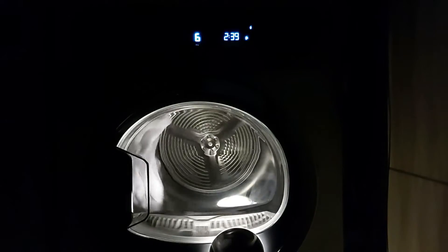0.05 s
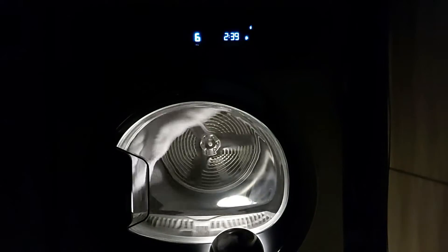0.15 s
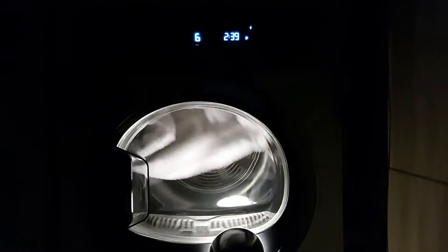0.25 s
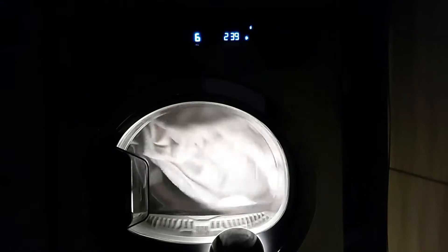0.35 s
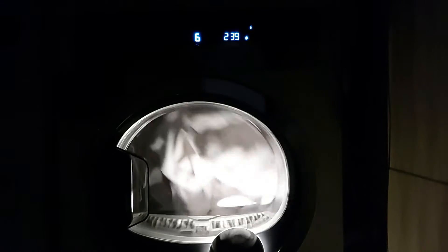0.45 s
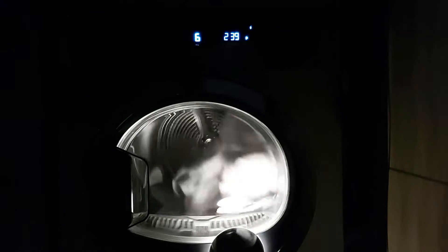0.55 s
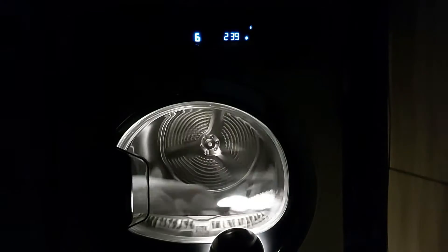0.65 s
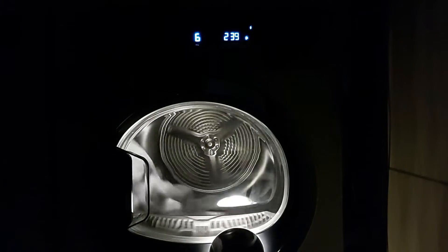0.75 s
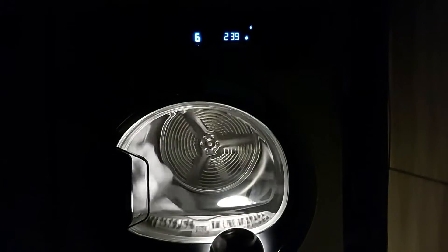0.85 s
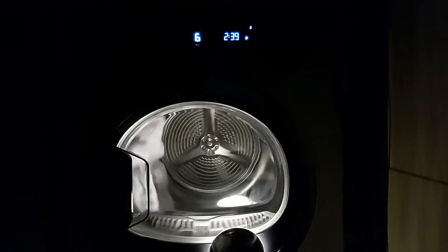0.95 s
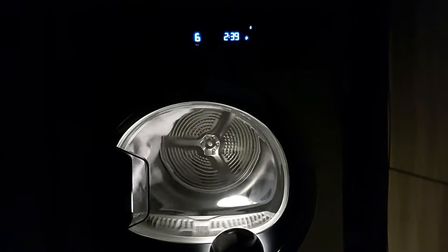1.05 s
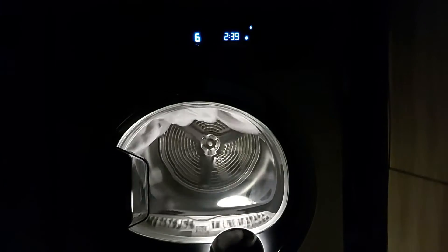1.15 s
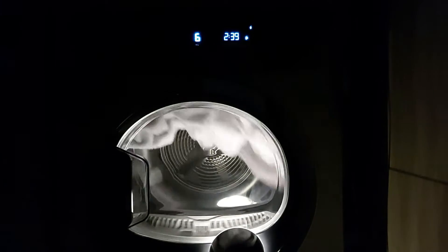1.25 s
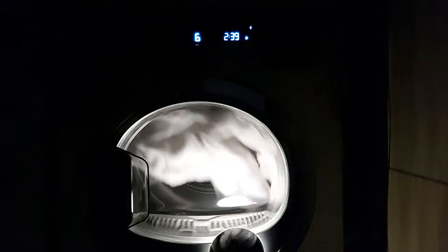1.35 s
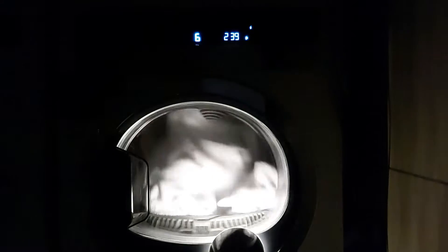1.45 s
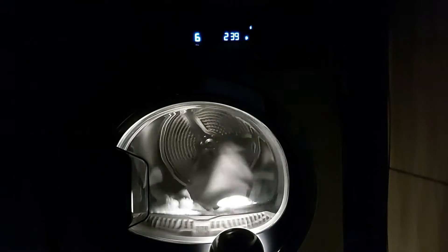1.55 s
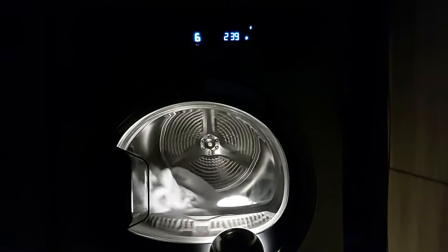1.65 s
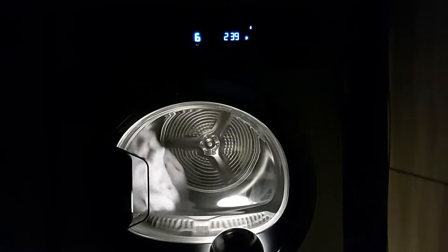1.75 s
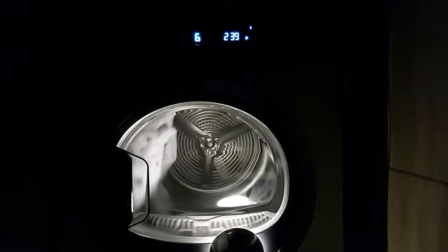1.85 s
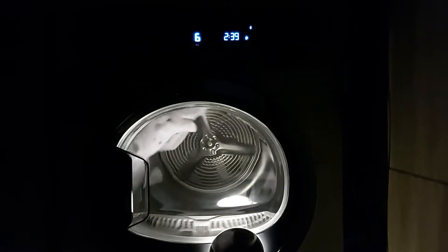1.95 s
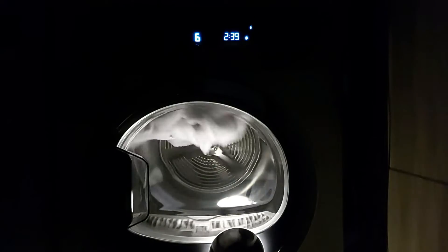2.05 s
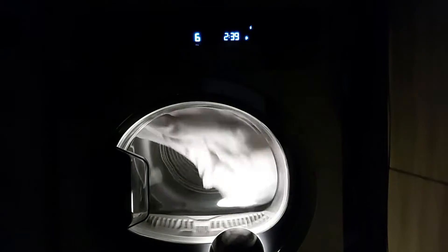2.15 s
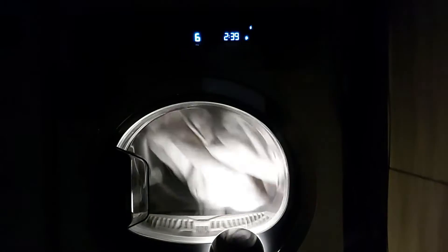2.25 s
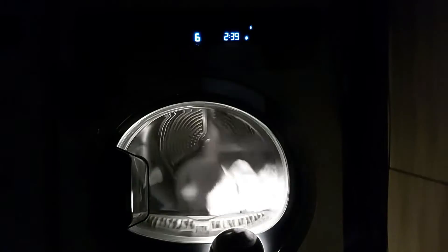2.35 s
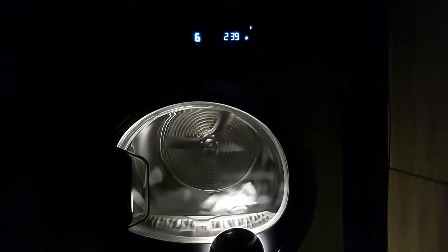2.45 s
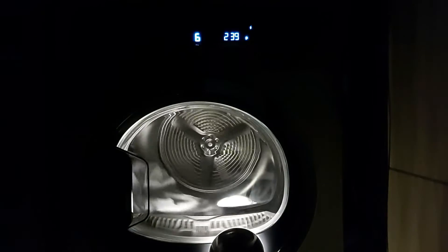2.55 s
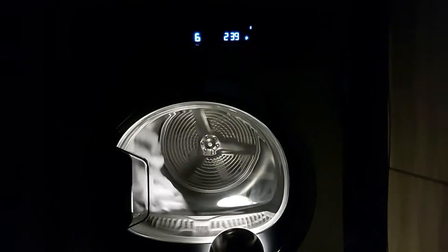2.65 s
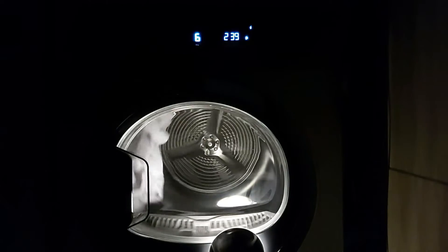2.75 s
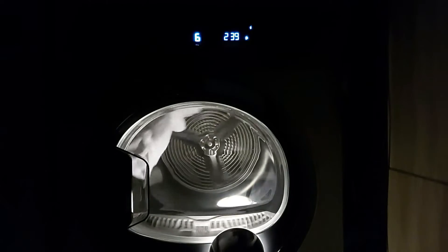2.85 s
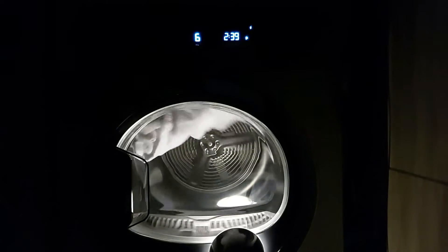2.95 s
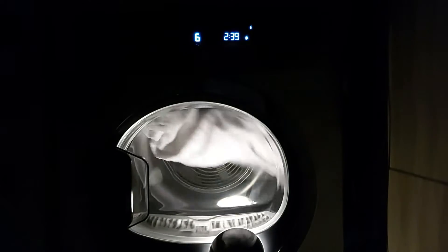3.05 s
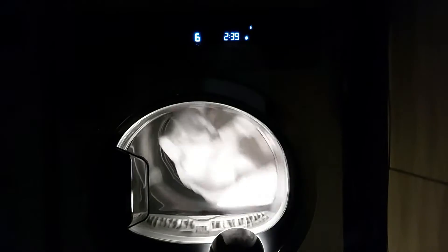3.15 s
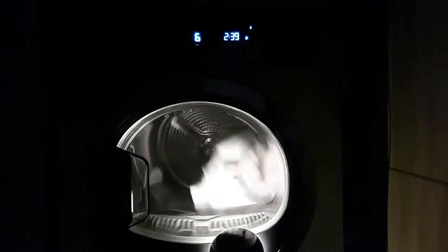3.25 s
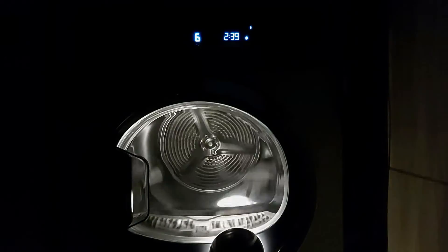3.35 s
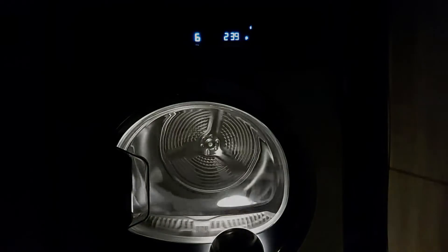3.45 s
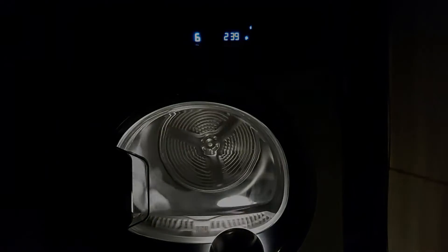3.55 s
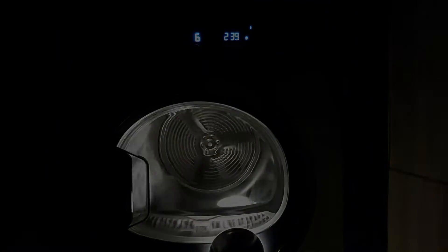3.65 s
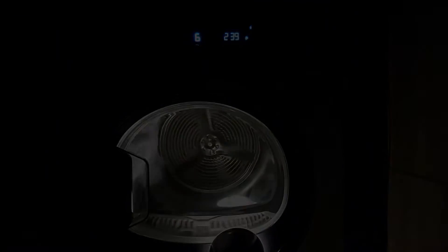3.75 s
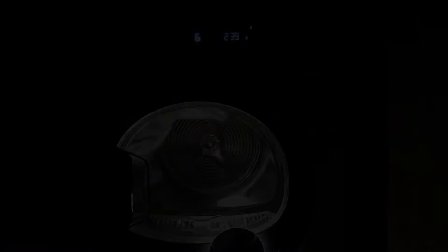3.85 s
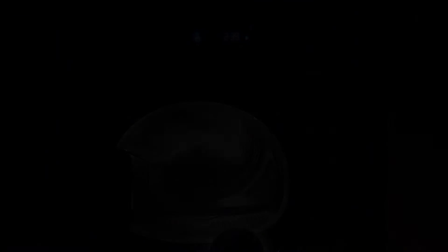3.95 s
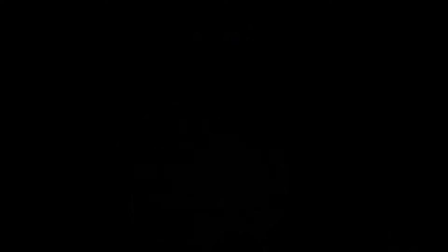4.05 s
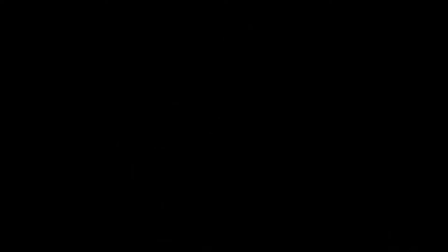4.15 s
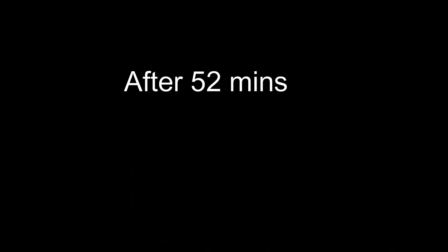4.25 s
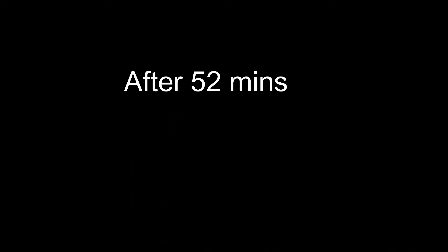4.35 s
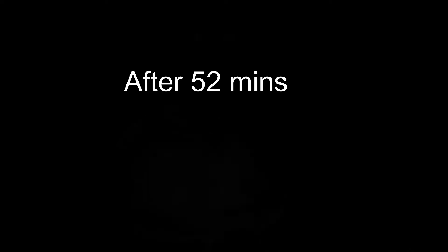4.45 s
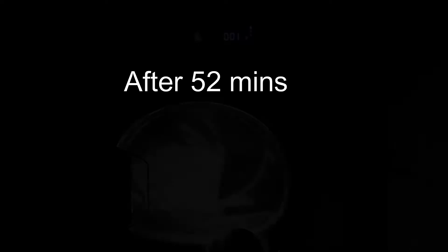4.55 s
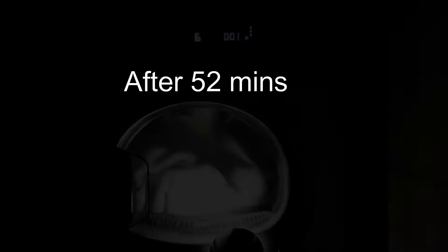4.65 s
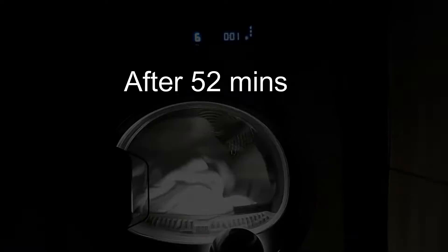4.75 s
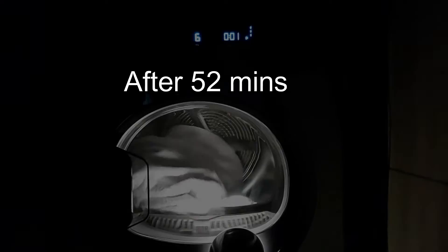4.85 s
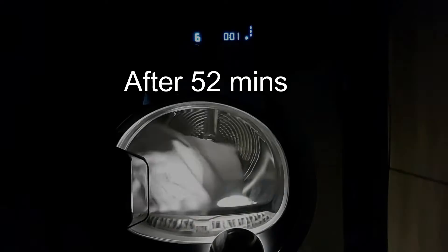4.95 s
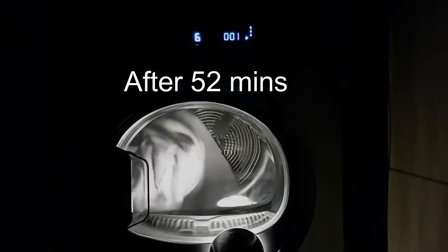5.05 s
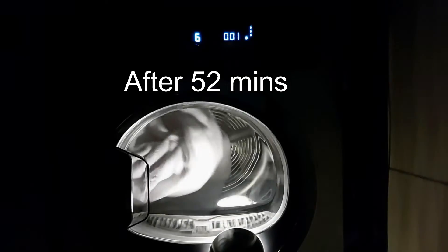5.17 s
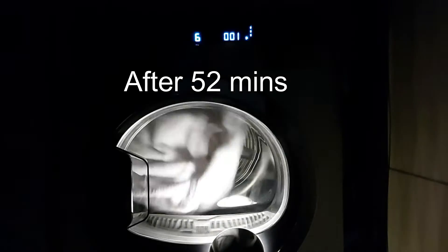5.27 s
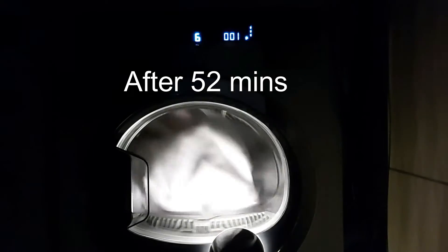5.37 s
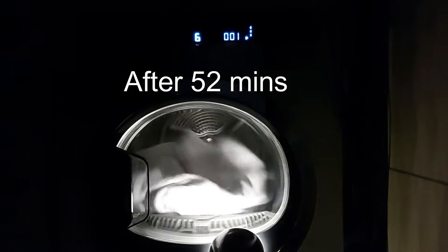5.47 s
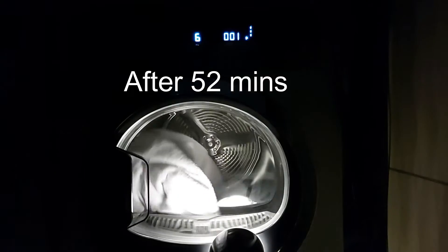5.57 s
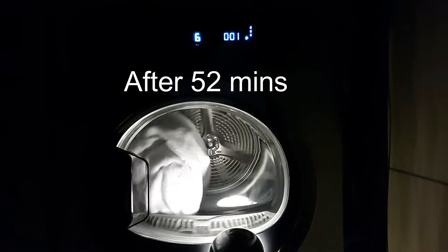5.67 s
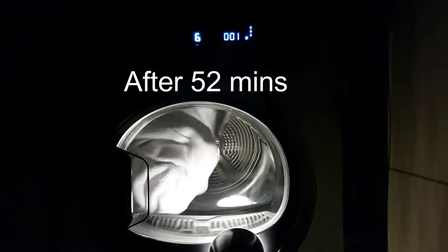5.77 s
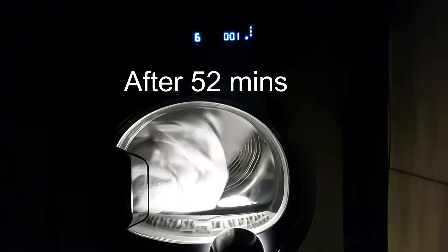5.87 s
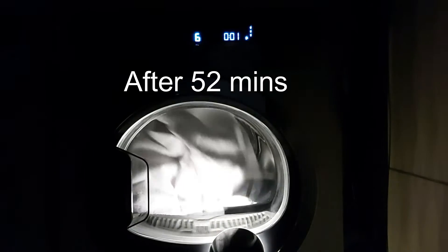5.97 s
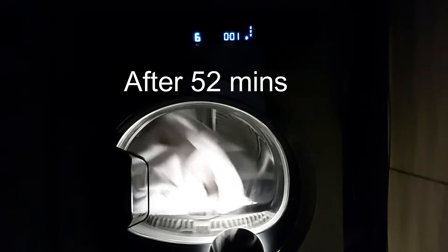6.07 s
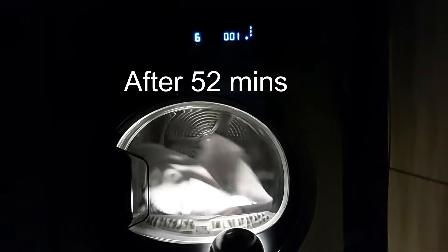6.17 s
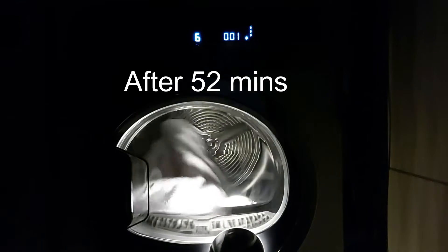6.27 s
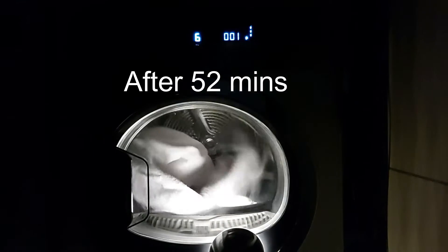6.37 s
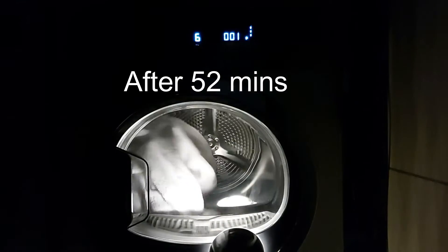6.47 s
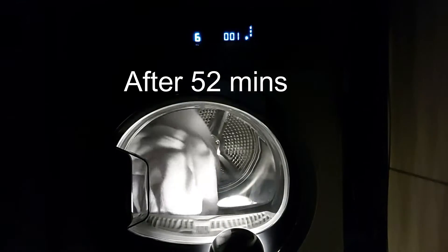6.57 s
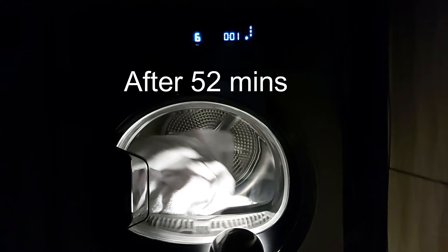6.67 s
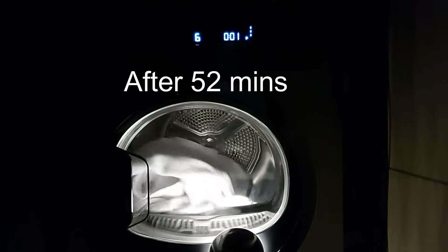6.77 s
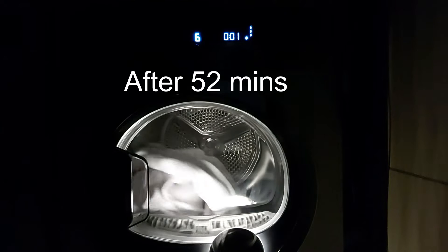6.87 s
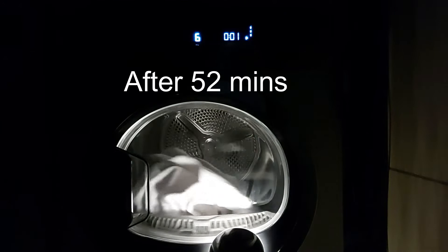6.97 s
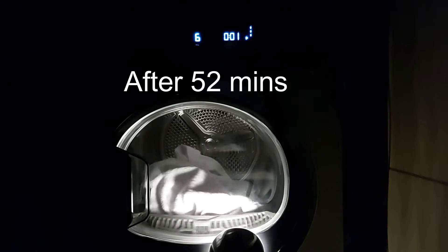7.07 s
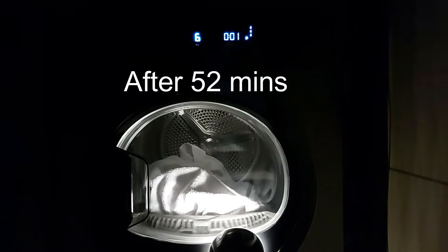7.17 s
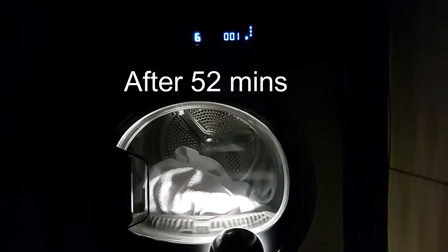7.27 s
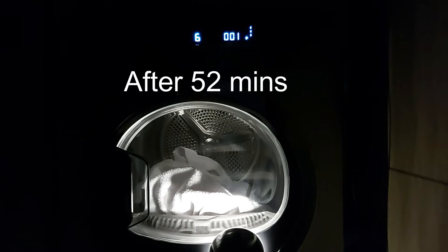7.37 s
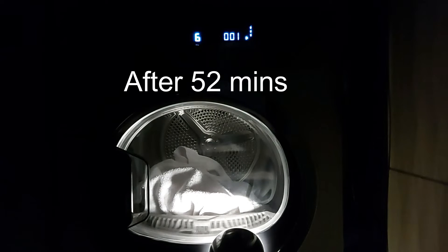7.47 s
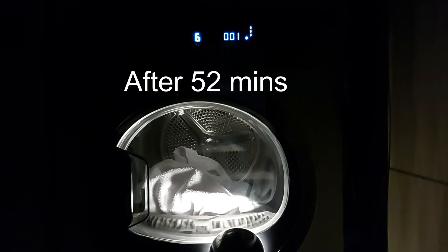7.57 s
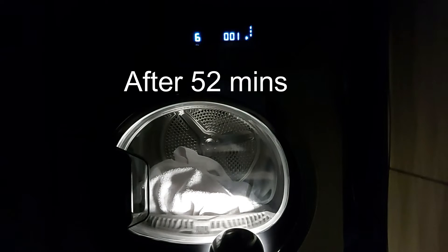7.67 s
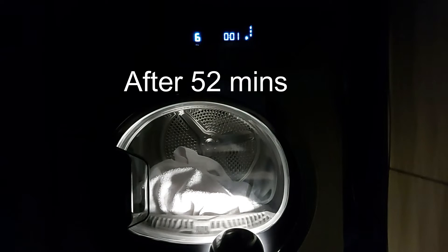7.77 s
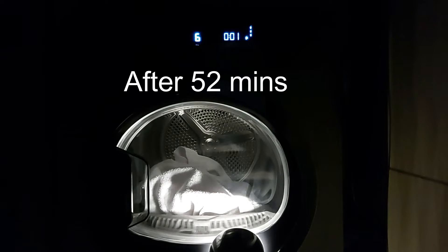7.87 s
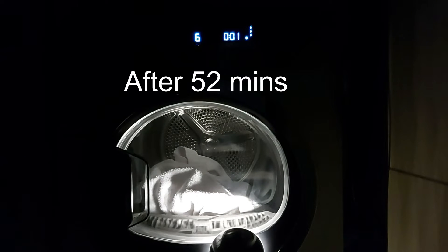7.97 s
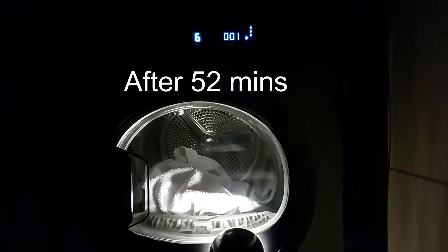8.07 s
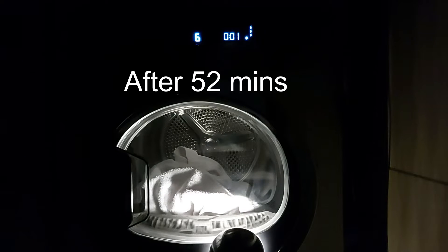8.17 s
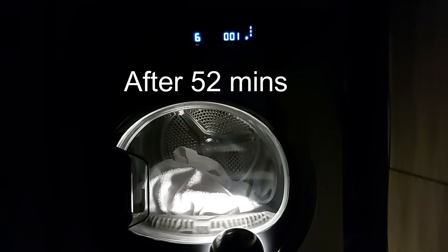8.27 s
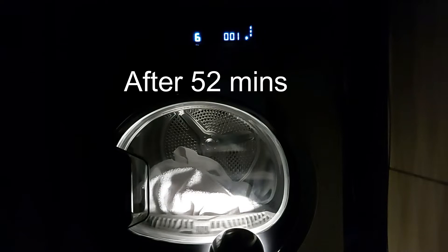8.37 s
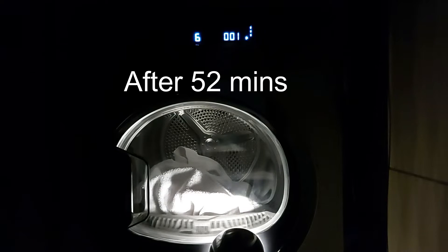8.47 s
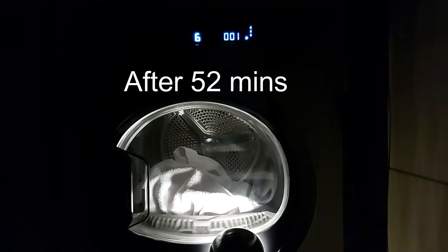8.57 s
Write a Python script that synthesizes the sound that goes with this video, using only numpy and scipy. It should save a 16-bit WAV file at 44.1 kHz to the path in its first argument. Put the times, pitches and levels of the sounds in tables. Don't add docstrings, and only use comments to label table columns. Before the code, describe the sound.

A tumble dryer runs close to the microphone in a small room: low booming hum, rushing air, thin motor buzz and whine, wet laundry thudding dully. It dips to a very brief gap, then resumes with a bulkier dry load and more frequent thumps. The motor cuts out, the drum coasts down, knocks softly on its mounts, and faint hiss remains with tiny metallic ticks.

```python
import sys
import numpy as np
from scipy import signal
from scipy.io import wavfile
from scipy.ndimage import uniform_filter1d

SR = 44100
rng = np.random.default_rng(int(sys.argv[2]) if len(sys.argv) > 2 else 0)


def invert_db(level):
    return 10 ** (np.asarray(level, dtype=float) / 20)


def unload_wav(signal):
    wavfile.write(
        sys.argv[1],
        SR,
        np.round(np.clip(np.atleast_2d(signal).T, -1, 1) * 32767).astype(np.int16),
    )


N = 379877
TIME = np.arange(N) / SR
CUT_S, RESUME_S = 4.343, 4.358
MOTOR_OFF_S, MOTOR_OFF_FALL_S = 6.42, 0.12
SHAFT_SAMPLES = 902
CARRIER_HZ = 12231
SLOT_HZ, SLOT_REST_DB = 1562, -58
LEFT_LAG_SAMPLES, TOP_CUT_HZ = 7, 15760

# time_s, level_db
EFFORT = [(0.0, 0), (3.56, 0.24), (4.06, -3), (4.34, -5.5), (4.36, -5), (4.56, -1.5), (4.77, -0.95),
          (5.6, 0.94), (6.0, 1.3), (6.4, -0.5), (6.56, -2.5), (6.8, -8), (7.01, -10.5), (7.21, -21),
          (7.31, -36), (7.5, -47)]
# wet_db, dry_db, switch_off_loss_db, coasting_fall_share
LAYERS = [
    (-29, -31.5, -0.5, 1.5),
    (-34, -37, 0, 1.04),
    (-43.5, -47.5, -4.5, 0.78),
    (-62.5, -64.5, -3.5, 1.14),
]
# time_s, rise_db, half_length_s
SURGES = [(0.13, 6, 0.14), (0.29, 1.5, 0.024), (0.61, 5.5, 0.025), (0.8, 3.5, 0.12), (1.01, 2.5, 0.13),
          (1.3, 10.5, .07), (1.73, 9.5, 0.029), (1.91, 3, 0.075), (2.05, 3, .05), (2.22, 4.5, 0.086),
          (2.49, 2.5, 0.049), (2.7, 6.5, 0.082), (3.03, 4, .1), (3.21, 6, 0.064), (3.4, 6, 0.035),
          (3.67, 8.5, 0.036), (3.86, 9, 0.064), (4.015, 9.5, 0.023), (4.21, 6.5, 0.094), (4.52, 4.5, 0.069),
          (4.88, 9.5, 0.022), (5.1, 3.5, 0.1), (5.32, 8.5, 0.022), (5.49, 3, .07), (5.9, 7, 0.1),
          (6.05, 6, 0.027), (6.31, 9, .018), (6.41, 8, .05), (6.61, 9, 0.083), (6.9, 5.5, 0.16)]
# centre_hz, width_hz, wet_db, dry_db
CABINET = [(44, 8, -17, -24), (52.84, 11, -26, -17.5), (77.6, 11, -4, -8), (92.1, 10, -10, -9.5),
           (103.6, 7, -3, 0.5), (114.6, 3.7, -11.5, -12.5), (123, 12, 0.5, -3.5), (150, 43, -16.5, -13.5)]
# centre_hz, width_hz, level_db
DRUM = [(192, 34, -42), (229, 7.3, -44.5), (294.2, 19, -42.5), (334.1, 13, -36.5), (379.7, 9.7, -46),
        (440.5, 15, -44.5), (476, 5.3, -50), (595.4, 22, -47), (703, 98, -41.5), (910, 17, -54.5)]
# freq_hz, density_db_per_hz
AIR_WET = [(88, -31), (150, -6), (244, -6.5), (333, -4), (520, -19), (608, -7.5), (950, -16), (1110, -19.5),
           (1570, -24), (1670, -25.5), (3110, -40.5), (5680, -44.5), (12100, -50.5), (14200, -48.5),
           (15600, -31.5)]
# freq_hz, density_db_per_hz
AIR_DRY = [(150, -4), (258, -12.5), (360, -11.5), (500, -19.5), (670, -9), (950, -16), (1490, -19),
           (2000, -25), (2700, -30.5), (3300, -37.5), (6300, -45.5), (10200, -55), (12400, -53.5),
           (14000, -56.5)]
BAND_TOPS_HZ = [900, 3000]
# centre_hz, width_hz, level_re_range_db, share_of_fall_withheld
DUCT = [(2570, 640, -16, 0.0), (6230, 690, -11, .35), (15400, 700, -10, .05)]
# start_s, peak_db, rattle_s, treble_db
THUDS = [(0.837, -28, 0.1, -20), (1.087, -22.5, 0.042, -30), (1.651, -16, 0.059, -8.5),
         (1.702, -19.5, 0.019, -20), (2.36, -24, 0.068, -15), (2.473, -20, 0.029, -22),
         (3.412, -24, 0.026, -15), (4.617, -18.5, 0.077, -11.5), (4.676, -33.5, 0.06837, -7),
         (4.766, -25, 0.093, -17), (4.911, -26.5, 0.046, -7), (5.496, -23.5, 0.086, -39),
         (5.543, -24, 0.031, -3), (5.573, -20, 0.074, -33), (5.666, -19, 0.049, -7),
         (5.73, -24.5, 0.05, -10), (5.945, -23, 0.021, -17), (6.208, -24.5, 0.079, -22),
         (6.351, -12, 0.035, -13.5), (6.372, -10, 0.026, -16), (6.405, -16, 0.037, -16.5),
         (6.556, -22, 0.061, -9.5), (6.617, -29, 0.05, -45), (6.941, -34, 0.031, -10.5)]
# freq_hz, level_db, t60_s
SHELL = [(239, -7, 0.3), (328.7, -9, 0.13), (355.3, -2.5, 0.27), (431, -5, 0.033), (569.6, -11, 0.15),
         (665, -5, .06), (746, -13, 0.045), (796, -11.5, 0.088), (923, -11.5, 0.12), (1081, -12, 0.017),
         (1256, -8, 0.023), (1515, -10.5, 0.026), (1790, -15, .02), (2222.2, -36, 0.013)]
# centre_s, level_db, half_length_s
SWISHES = [
    (5.985, -65.5, .12),
    (6.494, -56.5, .05),
]
# centre_hz, width_hz, level_db
BUZZ = [(3610, 88, -68.5), (4250, 500, -64.5), (5300, 220, -73), (5720, 210, -65), (8500, 1020, -74.5),
        (11600, 3000, -86)]
# freq_hz, level_db
EARLY_TONES = [(1147, -61), (1320, -59), (1368, -59), (1868, -65.5), (2444, -74), (11213, -81),
               (11822, -74), (12624, -78), (15116, -66), (15719, -58.5)]
# time_s, rise_db, half_length_s
SLOT_SWELLS = [(0.25, 3.5, 0.17), (0.73, 8.6, .14), (1.2, 9.1, 0.079), (1.67, 6, 0.048), (1.95, 4.1, .3),
               (2.42, 11.5, 0.056), (2.67, 4, 0.039), (2.91, 11, 0.056), (3.08, 6.5, .05), (3.37, 10.3, 0.16)]
# freq_hz, level_db
LATE_TONES = [(1459, -59.5), (8064, -83), (15186, -77), (15730, -75)]
# on_s, off_s
LATE_TONES_S = (4.73, 6.5)
# freq_hz, centre_s, half_length_s, level_db
COASTING_RING = (8600, 6.69, .09, -80)
# time_s, whine_offset_hz
MOTOR = [(6.47, 377), (6.6, 275), (6.8, 205), (7.0, 115), (7.2, 25), (7.4, 3)]
# offset_hz, half_width_hz, lift_db
WHINE_PANEL = (243, 48, 13)
# start_s, level_db, centre_hz, width_hz, length_s
SETTLING = [
    (7.257, -69, 230, 150, 0.064),
    (7.267, -57, 95, 69.4, 0.06),
    (7.33, -61, 99, 80, 0.065),
    (7.36, -75, 300, 300, 0.0435),
    (7.36, -79, 1200, 900, .03),
    (7.874, -68.5, 165, 49.62, .07),
    (7.878, -63.5, 350, 330, 0.064),
    (7.874, -71, 1210, 600, 0.057),
    (8.01, -71.5, 1250, 600, 0.04),
    (8.004, -76.5, 350, 300, 0.03092),
]
# time_s, gain_db
RECOVERY = [(7.0, -22), (7.35, -19.5), (7.65, -9), (7.8, -13.5), (7.97, -7), (8.05, -1.5), (8.61, 2)]
# level_db, recovery_share
HUSH = [
    (-78.5, 0.05),
    (-76.5, 0.37),
    (-68, 1.02),
]
# freq_hz, density_db_per_hz
HUSH_HISS = [(100, -39), (170, -3), (966, -9.5), (2130, -6), (2630, -4.5), (3980, -7.5), (5090, 0.5),
             (6380, -5), (11500, -6), (15500, -8.5)]
# start_s, peak_db, centre_hz
TICKS = [
    (8.4552, -48.5, 5660),
    (8.4774, -51.5, 3449),
    (8.543, -51, 2690),
]
# freq_hz, left_right_likeness
LIKENESS = [(60, 0.92), (130, 0.98), (290, 0.85), (640, 0.5), (1200, -0.043), (2600, 0.0036), (6820, -0.06),
            (15000, 0.19)]
# freq_hz, left_minus_right_db
LEAN = [(60, -2), (110, -4.0), (200, -7.5), (380, -5), (700, -2.5), (1290, -3.5), (2380, -6), (4400, -3.5),
        (8120, -3), (15000, -4.5)]


def rms_one(x):
    return x / np.sqrt(np.mean(x ** 2) + 1e-20)


def white_pair():
    return rng.standard_normal((2, N))


def in_time(rows):
    time_s, *columns = np.transpose(rows)
    return [np.interp(TIME, time_s, column) for column in columns]


def at_hz(points, hz):
    points = np.array(points)
    return np.interp(np.log(hz), np.log(points[:, 0]), points[:, 1])


def swells(rows):
    return sum(db * np.exp(-((TIME - s) / half_s) ** 2) for s, db, half_s in rows)


def drift(rate_hz):
    r = np.exp(-80 * np.pi * rate_hz / SR)
    slow = signal.lfilter([1], [1, -2 * r, r * r], rng.standard_normal(N // 40 + 2002))
    slow = rms_one(slow[2000:])
    return np.interp(np.arange(N) / 40, np.arange(len(slow)), slow)


def resonate(x, hz, width_hz):
    r = np.exp(-np.pi * width_hz / SR)
    poles = [1, -2 * r * np.cos(2 * np.pi * hz / SR), r * r]
    return signal.lfilter([(1 - r * r) / 2, 0, (r * r - 1) / 2], poles, x)


def resonate_twice(x, hz, width_hz):
    return resonate(resonate(x, hz, width_hz), hz, width_hz)


def bandpass(x, low_hz, high_hz):
    return signal.sosfilt(signal.butter(2, [low_hz, high_hz], "band", fs=SR, output="sos"), x)


def place(pair, hz):
    alike = np.clip(at_hz(LIKENESS, hz), -0.99, 0.99)
    lean_db = at_hz(LEAN, hz)
    both = np.sqrt(1 + alike) * pair[0] + np.sqrt(1 - alike) * pair[1] * [[1], [-1]]
    return both * invert_db(np.array([[lean_db / 2], [-lean_db / 2]]))


def noise_bands(patchy_db):
    edges_hz = 170 * 2 ** (np.arange(21) / 3.05)
    white = rng.standard_normal((2, 2, N))
    together = drift(5.0)
    for k, (low_hz, high_hz) in enumerate(zip(edges_hz, edges_hz[1:])):
        hz = np.sqrt(low_hz * high_hz)
        band = bandpass(white[k % 2], low_hz, high_hz)
        flicker_db = patchy_db * (0.5 * together + drift(9))
        yield hz, invert_db(flicker_db) * place(band, hz)


def levels(effort_db):
    off = np.clip((TIME - MOTOR_OFF_S) / MOTOR_OFF_FALL_S, 0, 1)
    layers_db = []
    for wet_db, dry_db, lost_db, share in LAYERS:
        load_db = np.where(TIME < CUT_S, wet_db, dry_db)
        layers_db.append(load_db + lost_db * off + (1 + (share - 1) * off) * effort_db)
    layers_db[0] = layers_db[0] + swells(SURGES)
    return layers_db


def boom(level_db):
    sound = 0
    for hz, width_hz, wet_db, dry_db in CABINET:
        mode = rms_one(resonate_twice(white_pair(), hz, 1.5 * width_hz))
        sound = sound + invert_db(np.where(TIME < CUT_S, wet_db, dry_db)) * place(mode, hz)
    swing = uniform_filter1d(sound.mean(0) ** 2, SR // 11) + 1e-9
    sound = sound / np.sqrt(swing)
    return invert_db(level_db) * sound / np.std(sound.mean(0))


def rush(roar_db, air_db, hiss_db):
    ranges = np.zeros((3, 2, N))
    early = TIME < CUT_S
    for hz, band in noise_bands(patchy_db=1.53):
        density_db = np.where(early, at_hz(AIR_WET, hz), at_hz(AIR_DRY, hz))
        ranges[np.searchsorted(BAND_TOPS_HZ, hz)] += band * invert_db(density_db)
    for part in (early, ~early):
        ranges[:, :, part] /= ranges[:, :, part].mean(1).std(1)[:, None, None]
    for hz, width_hz, db in DRUM:
        mode = rms_one(resonate(white_pair(), hz, width_hz))
        ranges[0] += invert_db(db + 34.0) * place(mode, hz)
    fall_db = hiss_db[5 * SR] - hiss_db
    for hz, width_hz, db, withheld in DUCT:
        duct = rms_one(resonate_twice(white_pair(), hz, width_hz))
        gain = invert_db(db + withheld * fall_db) * ~early
        ranges[np.searchsorted(BAND_TOPS_HZ, hz)] += gain * place(duct, hz)
    return invert_db(roar_db - 5.0) * ranges[0] + invert_db(air_db + 0.22) * ranges[1] + invert_db(hiss_db + 3.0) * ranges[2]


def landing(start_s, rise_s, length_s):
    since_s = np.maximum(TIME - start_s, 0)
    body = np.exp(-(since_s / max(length_s, 0.015)) ** 2)
    tail = 0.15 * np.exp(-since_s / 0.08)
    return np.minimum(since_s / rise_s, 1) * (body + tail)


def thuds():
    contacts_per_s = 1500
    low = sum(invert_db(db - 6.5) * landing(s, 0.003, length_s) for s, db, length_s, _ in THUDS)
    high = sum(invert_db(db + treble_db + 0.5) * landing(s, 0.0057, length_s)
               for s, db, length_s, treble_db in THUDS)
    out = 0
    for hz, db, t60_s in SHELL:
        hits = rng.random(N) < contacts_per_s / SR
        contacts = white_pair() * hits * np.sqrt(SR / contacts_per_s)
        width_hz = np.log(1000) / np.pi / min(1.5 * t60_s, 0.16)
        force = low if hz < 1000 else high
        ringing = resonate(contacts * force + 1e-18, hz, width_hz) * np.sqrt(SR / width_hz)
        out = out + invert_db(db - 14) * place(ringing, hz)
    for force, low_hz, high_hz, db in (low, 200, 1000, -7), (high, 900, 2500, -5):
        slap = bandpass(white_pair(), low_hz, high_hz)
        out = out + invert_db(db) * force * place(slap, low_hz * 1.8)
    return signal.sosfilt(signal.butter(6, 2550, fs=SR, output="sos"), out)


def swishes():
    shape = sum(invert_db(db) * np.exp(-((TIME - s) / half_s) ** 2) for s, db, half_s in SWISHES)
    return shape * bandpass(white_pair(), 2500, 14000)


def buzz():
    roughness = invert_db(-4 * np.linspace(0, 1, SHAFT_SAMPLES))
    one_turn = rng.standard_normal((2, SHAFT_SAMPLES)) * roughness
    turns = np.tile(one_turn, N // SHAFT_SAMPLES + 1)[:, :N]
    out = 0
    for hz, width_hz, db in BUZZ:
        out = out + invert_db(db + 1.3 * drift(5.2)) * place(rms_one(resonate(turns, hz, width_hz)), hz)
    return out


def tone(hz, db, wobble_db):
    phase = 2 * np.pi * np.cumsum(hz + np.zeros(N)) / SR
    phase = phase + 0.4 * drift(4) + np.mean(hz) / 70000 * drift(60)
    ear_phase = (0.3 + 0.15 * drift(8)) * [[1], [-1]]
    ears = np.sin(phase + ear_phase) * invert_db(np.array([[-0.6], [0.6]]))
    return np.sqrt(2) * invert_db(db + wobble_db * drift(2.5)) * ears


def whine():
    offset_hz, = in_time(MOTOR)
    slowing_db = 20 * np.log10(offset_hz / offset_hz[0])
    panel_hz, half_hz, lift_db = WHINE_PANEL
    upper_db = -73.5 + 0.95 * slowing_db + lift_db * np.exp(-((offset_hz - panel_hz) / half_hz) ** 4)
    lower_db = -76.5 + 0.6 * slowing_db
    sounding = np.clip((TIME - LATE_TONES_S[0]) / 0.03, 0, 1) * np.clip((MOTOR[-1][0] - TIME) / 0.1, 0, 1)
    upper = tone(CARRIER_HZ + offset_hz, upper_db, 0.94)
    lower = tone(CARRIER_HZ - offset_hz, lower_db, 2.0)
    return sounding * (upper + lower)


def drive_tones(early_gain):
    early = sum(tone(hz, db, 2.5 if hz < 3000 else 0.8) for hz, db in EARLY_TONES)
    early = early + tone(SLOT_HZ, SLOT_REST_DB + swells(SLOT_SWELLS), 1.2)
    on_s, off_s = LATE_TONES_S
    sounding = np.clip((TIME - on_s) / 0.0301, 0, 1) * np.clip((off_s - TIME) / 0.15, 0, 1)
    late = sum(tone(hz, db, 2) for hz, db in LATE_TONES) * sounding
    hz, centre_s, half_s, db = COASTING_RING
    ring = tone(hz, db, 1) * np.exp(-((TIME - centre_s) / half_s) ** 4)
    return early * early_gain + late + ring + whine()


def settling():
    out = 0
    for s, db, hz, width_hz, length_s in SETTLING:
        puff = rms_one(resonate_twice(white_pair(), hz, width_hz))
        out = out + invert_db(db) * landing(s, 0.012, length_s) * place(puff, hz)
    return out


def burst(start_s, rise_s, length_s):
    since_s = np.maximum(TIME - start_s, 0)
    return np.minimum(since_s / rise_s, 1) * invert_db(-20 * since_s / max(length_s, 0.01))


def ticks():
    out = 0
    for s, db, hz in TICKS:
        envelope = burst(s, 0.00027, 0.0091) + 0.52 * burst(s, 0.002, 0.11)
        out = out + invert_db(db) * envelope * rms_one(resonate(white_pair(), hz, 1.16 * hz))
    return invert_db(-6.5) * out


def hush():
    gain_db, = in_time(RECOVERY)
    hum_db, room_db, hiss_db = (db + share * gain_db for db, share in HUSH)
    hum = place(rms_one(resonate_twice(white_pair(), 100, 75)), 108)
    ranges = np.zeros((2, 2, N))
    for hz, band in noise_bands(patchy_db=0.0):
        ranges[int(hz > 1500)] += invert_db(at_hz(HUSH_HISS, hz)) * band
    room, hiss = rms_one(ranges[0]), rms_one(ranges[1])
    return invert_db(hum_db) * hum + invert_db(room_db) * room + invert_db(hiss_db + 3.0) * hiss


def scene():
    boom_db, roar_db, air_db, hiss_db = levels(*in_time(EFFORT))
    stopped = np.clip((7.75 - TIME) / 0.12, 0, 1)
    early_gain = invert_db(hiss_db - hiss_db[SR]) * (TIME < CUT_S)
    machine = stopped * (boom(boom_db) + rush(roar_db, air_db, hiss_db)) + early_gain * buzz()
    left, right = machine + thuds() + swishes() + settling() + hush() + ticks()
    return np.array([np.roll(left, LEFT_LAG_SAMPLES), right]) + drive_tones(early_gain)


def roll_off(x):
    return signal.sosfilt(signal.butter(12, 17110, fs=SR, output="sos"), x)


def record(dry):
    gap = np.clip(np.maximum(CUT_S - TIME, TIME - RESUME_S) / 0.0021, 0, 1)
    top_cut = signal.ellip(14, 0.3, 60, TOP_CUT_HZ, fs=SR, output="sos")
    mix = signal.sosfilt(top_cut, dry * gap)
    return roll_off(mix)


dry = scene()
out = record(dry)
unload_wav(out)
```